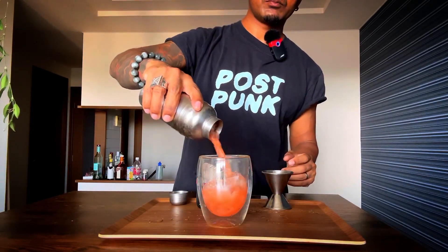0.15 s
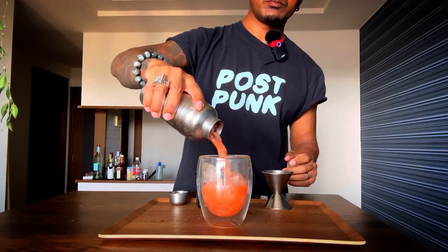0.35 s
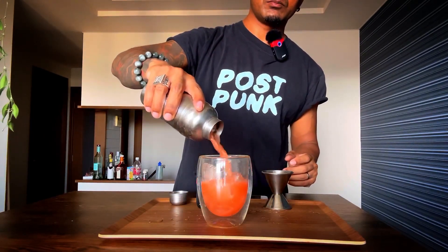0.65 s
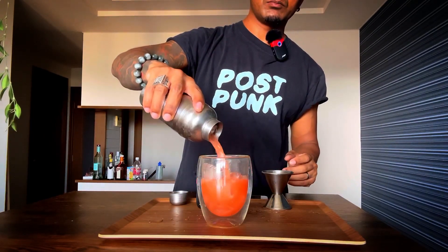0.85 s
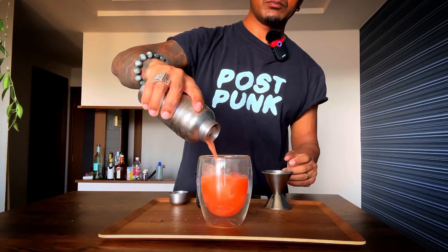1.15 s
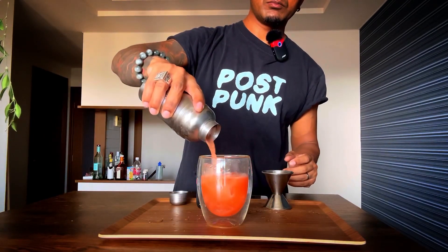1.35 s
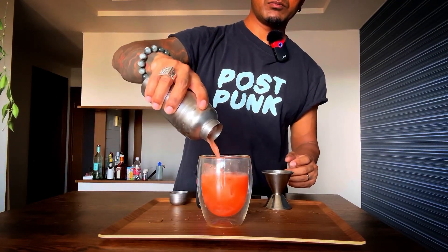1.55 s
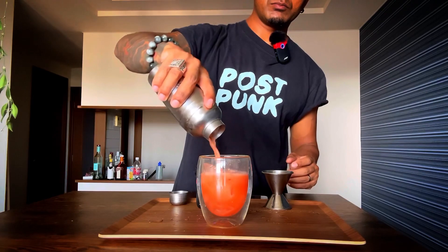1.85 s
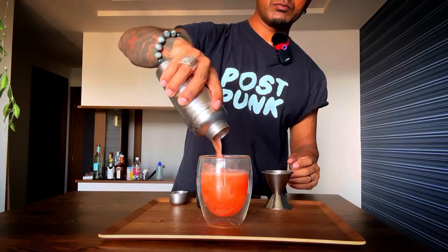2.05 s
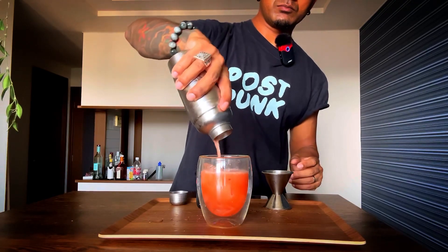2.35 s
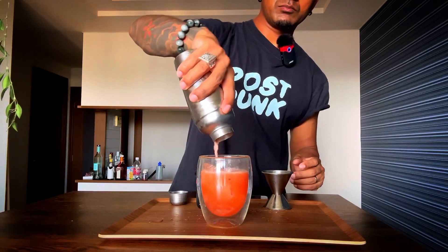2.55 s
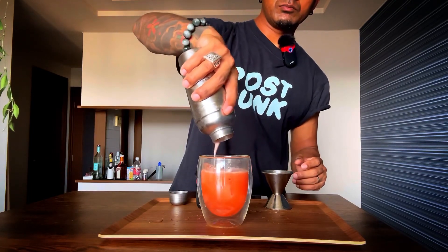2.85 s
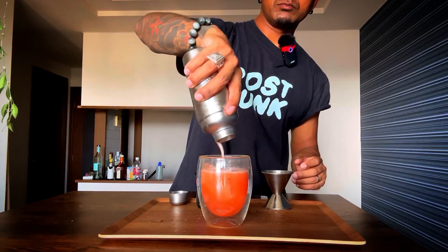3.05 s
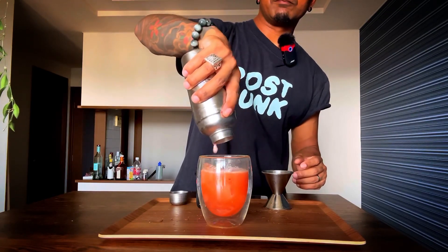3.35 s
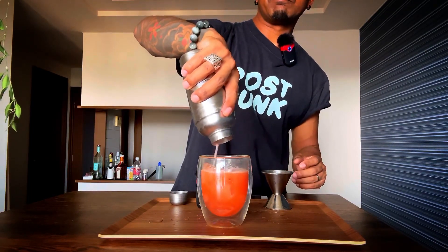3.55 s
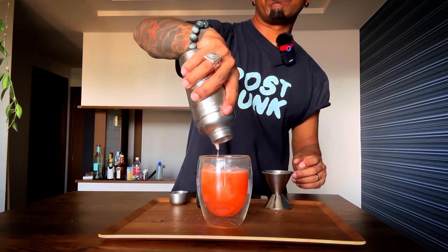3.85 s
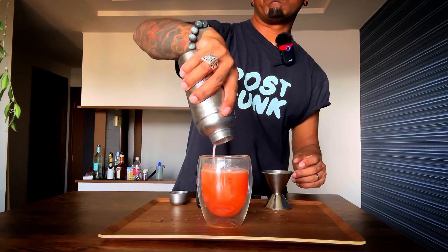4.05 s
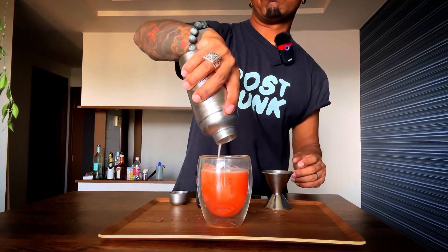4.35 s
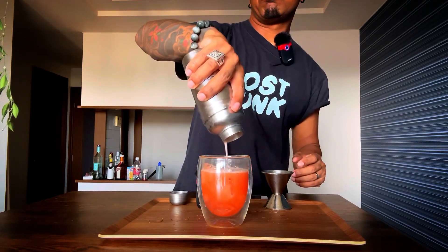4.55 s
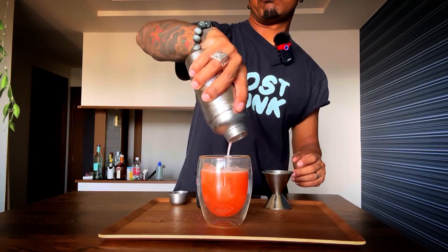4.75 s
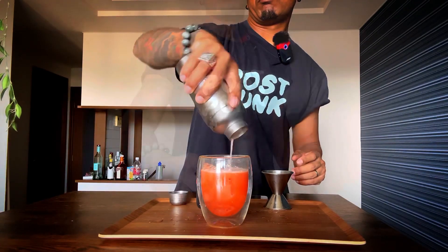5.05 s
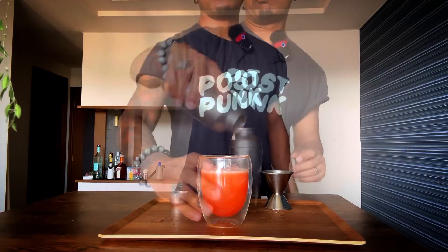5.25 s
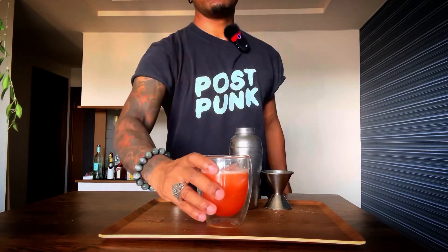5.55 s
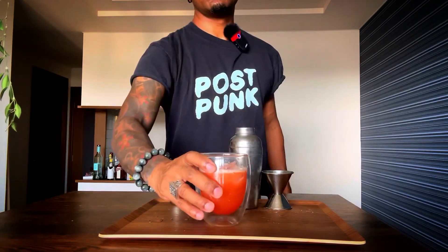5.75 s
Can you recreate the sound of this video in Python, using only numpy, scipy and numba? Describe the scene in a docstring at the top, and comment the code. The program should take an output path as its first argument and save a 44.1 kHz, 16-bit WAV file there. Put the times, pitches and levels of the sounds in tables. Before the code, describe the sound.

A close microphone catches thick slush splashing into a glass with small droplets and glassy ringing. The flow shrinks to a trickle, loose ice tumbles down the steel shaker and one cube snaps loudly against it. Regular, rapid, crunchy shakes follow, each with a short metallic rattle. They end abruptly, leaving soft low room tone in a small, slightly reverberant kitchen.

```python
"""Slushy cocktail poured from a steel shaker

A slushy drink pours into a glass in a small, quiet room, heard close up. Random grains and ringing bubbles
make the stream, which splashes, fizzes and thins; filtered bursts make the drops, the ice knocks and a hard crack.
The shaker is jiggled about seven times a second: ice and slush crunch on the strainer, ringing the steel, then stop.
Decaying sines make soft low thumps; filtered noise and wavering sines make the rumble, rustle and hum behind.
"""
import sys
import numpy as np
from scipy import signal
from scipy.fft import rfft, irfft, next_fast_len
from scipy.io import wavfile
from numba import njit

SR = 44100
rng = np.random.default_rng(int(sys.argv[2]) if len(sys.argv) > 2 else 0)


def wav_record(signal):
    """Record a signal, one row per channel, as 16-bit PCM in the file named by sys.argv[1]."""
    frames = np.transpose(np.atleast_2d(signal))
    bounded = np.clip(frames, -1, 1)
    # unit amplitude maps onto the largest positive 16-bit level
    quanta = np.round(bounded * 32767).astype(np.int16)
    wavfile.write(sys.argv[1], SR, quanta)


N = 259749
T = np.arange(N) / SR


def undb(db):
    """Decibels to gain."""
    return 10 ** (np.asarray(db) / 20)


def unit(x):
    """Scale to rms 1."""
    return x / np.sqrt(np.mean(x ** 2))


def curve(rows):
    """Second column of a timed table, drawn as straight lines through every sample."""
    times, values = np.transpose(rows)
    return np.interp(T, times, values)


def spectrum(points, hz):
    """Level in dB of a spectrum at the given frequencies, on a logarithmic frequency scale."""
    f, db = np.transpose(points)
    return np.interp(np.log(hz + 1), np.log(f), db)


def colour(x, points):
    """Filter a signal with a spectrum; rms 1."""
    size = next_fast_len(N)
    gain = undb(spectrum(points, np.fft.rfftfreq(size, 1 / SR)))
    return unit(irfft(rfft(x, size) * gain, size)[:N])


def add(out, s, x):
    """Mix a short sound in at time s."""
    i = int(np.clip(s * SR, 0, N - 1))
    out[i:i + len(x)] += x[:N - i]


def walk(rate):
    """Random wander with a spread near 1, through rate new values a second."""
    knots = rng.standard_normal(400)
    return np.interp(T * rate, np.arange(len(knots)), knots)


def grains(rate, spread_db):
    """Single-sample clicks of either sign and uneven size, rate a second on average."""
    clicks = (rng.random(N) < rate / SR) * rng.choice([-1, 1], N)
    return clicks * undb(spread_db * np.minimum(rng.exponential(size=N), 4))


def bubbles(count, low_hz, high_hz, cycles, spread_db, glide):
    """Bubbles at random times ring for some cycles, rising in pitch if glide is positive; most are faint."""
    out = np.zeros(N)
    for when, pitch, strength in rng.random((count, 3)):
        hz = low_hz * (high_hz / low_hz) ** pitch
        # age counts decay time constants, each lasting the given cycles
        age = np.arange(int(5 * cycles * SR / hz)) * hz / SR / cycles
        # sqrt(hz) makes up for the shorter life of a high bubble
        size = undb(spread_db * min(-np.log(1 - strength), 4)) * np.sqrt(hz)
        envelope = np.exp(-age) * (1 - np.exp(-8 * age))
        add(out, when * T[-1], size * envelope * np.sin(2 * np.pi * cycles * age * (1 + glide * age)))
    return unit(out)


def ring(x, modes):
    """What an object with these modes sings when x drives it: a sum of decaying sines."""
    t = T[:SR // 2]
    response = 0
    for hz, db, t60 in modes:
        mode = np.sin(2 * np.pi * hz * t) * 1000. ** (-t / t60)
        response = response + undb(db) * mode / np.linalg.norm(mode)
    return signal.fftconvolve(x, response)[:N]


@njit
def resonate(x, hz, width):
    """Band-pass with a moving centre [Hz] and a fixed width [Hz]."""
    y, band, low = np.empty(len(x)), 0., 0.
    for i in range(len(x)):
        g, k = np.tan(np.pi * hz[i] / SR), width / hz[i]
        v = (band + g * (x[i] - low)) / (1 + g * (g + k))
        band, low, y[i] = 2 * v - band, low + 2 * g * v, k * v
    return y


HIT_S = .006  # span over which a hit's level is reckoned


def contact(shape_db, crumble, crumble_s, size=1024):
    """A sharp push and a brief random crumbling, sent through a spectrum; rms 1 over HIT_S."""
    # causal (minimum-phase) response: all energy follows the moment of contact
    cepstrum = irfft(np.log(undb(shape_db)))[:size // 2]
    response = irfft(np.exp(rfft(2 * cepstrum, size) - cepstrum[0]))
    push = rng.standard_normal(size) * np.exp(-T[:size] / crumble_s)
    push *= crumble / np.linalg.norm(push)
    push[0] = 1
    # the crumbling scatters the push in time more than it colours it
    scatter = rfft(push, 2 * size)
    push = irfft(scatter / np.sqrt(np.abs(scatter)))[:size]
    hit = signal.fftconvolve(push, response)
    return hit * np.sqrt(HIT_S * SR) / np.linalg.norm(hit)


def hits(rows, base, below_db, ring_db, ring_width, crumble, crumble_s, size=1024):
    """Contacts coloured by each piece: one short resonance, a slope per octave below it, a treble slope."""
    out, hz = np.zeros(N), np.fft.rfftfreq(size, 1 / SR)
    for s, db, ring_hz, treble_db in rows:
        octaves = np.log2((hz + 1) / ring_hz)
        shape = spectrum(base, hz)
        shape += spectrum([(3500, 0.0059), (7000, treble_db)], hz)
        shape += below_db * np.clip(-octaves, 0, 2)
        shape += ring_db / (1 + (octaves / ring_width) ** 2)
        add(out, s, undb(db) * contact(shape, crumble, crumble_s))
    return out


# strength of the stream, which splash, fizz and droplets follow: (time [s], level [dB])
FLOW = [(0.0, -48), (0.24, -51), (0.45, -51), (0.97, -57), (1.08, -57.5), (2.1, -53.5), (2.55, -56),
        (2.8, -59.5), (3.26, -50), (4.4, -63.5), (5.02, -61.5), (5.2, -99)]
# air above the drink rises in pitch as the glass fills: (time [s], resonance [Hz])
CAVITY = [(0, 1130), (.2, 1290), (.42, 1620), (.8, 1740), (2.4, 1710), (5, 1880)]
# the loudest drops and ice chips landing in the glass:
# (time [s], level [dB], ring [Hz], treble slope [dB])
DROPS = [(0.0234, -32.5, 6300, -11), (0.0752, -36, 8700, -12), (0.0856, -38, 5940, -3),
         (0.1536, -35.5, 10500, -4), (0.2244, -44, 6160, -13), (0.2323, -33.5, 3800, -8),
         (0.2486, -37.5, 9150, 11), (0.2562, -35, 3600, -28), (0.2835, -36, 1600, -14),
         (0.3029, -39.5, 8450, -11), (0.3543, -37.5, 7350, -14), (0.3851, -35, 1300, -0.5),
         (0.4061, -35, 1740, -8), (0.5057, -38, 2560, -23), (0.6268, -45, 6100, 2),
         (0.6401, -40, 3300, -17), (0.6446, -32.5, 2720, -6.5), (0.67, -38.5, 5430, 0),
         (0.681, -37, 1600, 2), (0.7256, -34.5, 8950, 13), (0.7956, -32.5, 5700, -6),
         (0.8296, -40.5, 5500, 1), (0.852, -42, 9300, -15), (0.9321, -39.5, 710, -17),
         (0.9658, -42.5, 650, 2), (0.9699, -32.5, 2820, -35), (1.2442, -49.5, 4220, -4),
         (1.4773, -47.5, 8740, 2), (1.9243, -48.5, 1480, -15), (1.9531, -54.5, 1750, -5),
         (2.26, -52.5, 7900, -10)]
# tone of splash, froth and drops: (frequency [Hz], level [dB])
SPLASH_COLOUR = [(100, -30), (220, -23), (400, 0), (700, 4.5), (930, -4), (1200, 0), (1650, -2), (2000, -9),
                 (2550, 2), (3600, -8), (6000, -14), (15000, -33)]
FIZZ_COLOUR = [(1000, -55), (4000, -3.5), (6500, 1), (9500, 2.5), (12500, -2.5), (16000, -9)]
DROP_COLOUR = [(100, -35), (500, -8.5), (1300, 0), (2600, -4), (4200, -12), (7000, -0.5), (11000, -5.5),
               (16000, -24)]
# modes of the glass wall and its air: (frequency [Hz], level [dB], decay by 60 dB [s])
GLASS = [(1143, -7, .18), (1262, -11, .18), (1610, -9, .1), (2377, -2, .14), (2560, -7, .13),
         (5280, -3, .16), (5520, -2, .16), (7415, -10, .1)]
THINS_S, TRICKLE_END_S = (0.96, 1.14), 2.4  # thick stream narrows to a trickle; last free droplets
FIZZ_DB, FIZZ_GROWTH, FIZZ_FLICKER_DB = -59, 0.74, 2.5  # at full flow; dB per dB of flow; wander


def pour():
    """The stream splashes and bubbles into the glass; the air above the drink resonates, froth fizzes."""
    # a thick stream traps ringing bubbles; the thin trickle that follows mostly ticks
    flow_db, plunge = curve(FLOW), np.interp(T, THINS_S, [1, .28])
    large = bubbles(count=3400, low_hz=800, high_hz=4000, cycles=6, spread_db=3.2, glide=.016)
    ticks = .6 * unit(grains(rate=1500, spread_db=3.5))
    splash = colour(ticks + plunge * large, SPLASH_COLOUR)
    splash = unit(splash + 1.3 * resonate(splash, curve(CAVITY), 176.0))
    froth = bubbles(count=4500, low_hz=3500, high_hz=14000, cycles=5, spread_db=4.5, glide=.008)
    pops = .25 * unit(grains(rate=500, spread_db=4))
    fizz = colour(plunge * froth + pops, FIZZ_COLOUR) * undb(FIZZ_FLICKER_DB * walk(30))
    fizz_db = FIZZ_DB + FIZZ_GROWTH * (flow_db - flow_db.max())
    stream = splash * undb(flow_db - 5.5) + fizz * undb(fizz_db)
    small = droplets(0, THINS_S[0], count=26) + droplets(THINS_S[0], TRICKLE_END_S, count=12)
    drops = hits(DROPS + small, DROP_COLOUR, below_db=-3.0, ring_db=15, ring_width=.14,
                 crumble=1.5, crumble_s=0.0025)
    wet = stream + drops
    return wet + undb(-22.5) * ring(wet, GLASS)


DROPLET_DB, DROPLET_SPREAD_DB = 6.5, 2.5  # above the flow strength; random either way
DROPLET_LOW_HZ, DROPLET_HIGH_HZ = 1216, 7850


def droplets(start_s, end_s, count):
    """Fainter drops of random size, spread unevenly over a stretch of the pour; the level follows the flow."""
    rows = []
    for k, (when, size, strength, bright) in enumerate(rng.random((count, 4))):
        s = start_s + (end_s - start_s) * (k + when) / count
        db = np.interp(s, *np.transpose(FLOW)) + DROPLET_DB + DROPLET_SPREAD_DB * (2 * strength - 1)
        ring_hz = DROPLET_LOW_HZ * (DROPLET_HIGH_HZ / DROPLET_LOW_HZ) ** size
        rows.append((s, db, ring_hz, -12 + 16 * bright))
    return rows


# jiggles of the shaker: (time [s], knock on the strainer [dB], slush thrown with it [dB],
# time until the ice falls back [s], its landing [dB])
JIGGLES = [(2.6935, -57, -51.5, .056, -49), (2.8355, -40.5, -62, 0.048, -51),
           (2.9765, -45.5, -54, 0.046, -45.5), (3.1324, -44, -45.5, 0.039, -40.5),
           (3.275, -41, -45.5, .028, -45), (3.4084, -33.5, -49, 0.019, -47), (3.5365, -45, -48, 0.028, -47),
           (3.6704, -45, -45, 0.039, -44), (3.8086, -41, -45.5, 0.04, -48), (3.947, -44.5, -45, 0.038, -47),
           (4.0839, -42, -48.5, 0.029, -51), (4.2135, -41, -55.5, 0.035, -52.5),
           (4.3468, -46, -50, 0.029, -52.5), (4.4783, -51, -52, 0.045, -54.5),
           (4.6174, -57.5, -57, 0.027, -58.5), (4.7417, -44.5, -52.5, 0.041, -50.5),
           (4.8801, -41.5, -51.5, 0.04, -48.5), (5.0085, -48.5, -60, 0.045, -74)]
# single cubes tumbling down the shaker as it is tipped up, and two loose chips just ahead of the jiggle knocks
# at 3.13 s and 3.28 s: # (time [s], level [dB], ring [Hz], treble slope [dB])
KNOCKS = [(1.369, -51.5, 2540, -6), (1.4218, -40.5, 2380, 1), (1.5095, -54.5, 2600, -6),
          (1.5946, -45.5, 2767, 14.5), (1.6197, -41.5, 2530, 10), (1.6291, -45, 2536, -1),
          (1.7193, -33, 4600, -1), (1.7449, -42, 2740, 7), (1.7557, -35.5, 2900, 1),
          (1.8212, -48.5, 2200, 0), (1.8369, -54, 3320, 22), (2.0117, -46, 1662, 10.5),
          (2.017, -46, 2780, -19), (2.1167, -44, 2704, -9), (2.1415, -39, 815, -21), (2.1514, -35, 3100, 2),
          (2.2965, -51.5, 1700, -3), (2.4154, -45, 1570, -13), (2.4332, -55, 2450, 10),
          (3.1036, -49.5, 2740, -8), (3.2452, -43, 2720, 3)]
# slush sliding down the upended shaker: (time [s], level [dB])
SLIDE = [(2.2, -100), (2.4, -60), (2.7, -61), (2.95, -65), (3.2, -100)]
# tone of slush, slide, tumbling cubes and jiggled ice: (frequency [Hz], level [dB])
SLUSH_COLOUR = [(80, -7), (220, 5.5), (350, 8.5), (480, -9), (680, 7), (950, -12.5), (1180, 3.5),
                (1500, -7.5), (1900, -3), (2700, 1), (4200, -14.5), (5300, -12), (7000, -22), (15000, -21)]
SLIDE_COLOUR = [(100, -25), (280, 5.5), (500, -5), (820, 0), (1300, -19), (2100, -9), (2450, -15),
                (2900, -9), (8000, -36)]
TUMBLE_COLOUR = [(100, 4), (400, 9), (900, 11.5), (1200, 4.5), (1900, 12.5), (2200, 6.5), (2750, 14),
                 (3600, 1), (4700, 0.5), (5600, -6.5), (7500, -6.5), (11000, -15), (16000, -36.5)]
ICE_COLOUR = [(100, 5), (300, 9), (700, 12.5), (1400, 4.5), (2700, 6), (4500, -5), (7800, -6.5),
              (9500, -10.5), (16000, -34)]
# modes of the steel shaker: (frequency [Hz], level [dB], decay by 60 dB [s])
STEEL = [(1150, -11, .06), (1885, -5.5, .09), (2540, -6.5, .13), (2585, -5, .13), (2790, -12, .06),
         (3690, -7, .08), (4640, -8, .08), (6620, -7, .07), (7310, -5, .07), (8035, 0, .09),
         (9700, -3, .08), (11830, 0, .09)]
# slush crunches in a short burst going forward and a longer, softer one going back
THROW_S, SETTLE_S, SETTLE_LAG_S, SETTLE_DB = 0.013, 0.023, 0.0063, -8


def shaker():
    """Cubes knock and slush crunches against the strainer, then falls back; the steel rings with both."""
    force = np.zeros(N)
    for s, _, slush_db, back_s, back_db in JIGGLES:
        force += undb(slush_db) * np.exp(-((T - s) / THROW_S) ** 2)
        settle = s + back_s + SETTLE_LAG_S
        force += undb(back_db + SETTLE_DB) * np.exp(-((T - settle) / SETTLE_S) ** 2)
    # chips of every size give short, low-pitched and high-pitched crunches
    chips = bubbles(count=5000, low_hz=500, high_hz=9000, cycles=2, spread_db=2.5, glide=0)
    slush = force * colour(unit(grains(rate=2400, spread_db=3.5)) + .5 * chips, SLUSH_COLOUR)
    # with the shaker upended, slush slides softly down its wall
    slide = colour(grains(rate=4000, spread_db=1), SLIDE_COLOUR) * undb(curve(SLIDE))
    tumbling = hits(KNOCKS, TUMBLE_COLOUR, below_db=-6.5, ring_db=7, ring_width=0.25,
                    crumble=2.2, crumble_s=0.0011)
    jiggling = hits(jiggle_knocks(), ICE_COLOUR, below_db=-1.5, ring_db=10.5, ring_width=0.1,
                    crumble=2.4, crumble_s=.0016)
    ice = slush + slide + jiggling
    # tumbling cubes and the hardest blow are mostly dry snaps and ring the wall less
    snap = crack()
    driven = ice + .6 * tumbling + .25 * snap
    return ice + tumbling + snap + undb(-21) * ring(driven, STEEL)


# a leading cube touches just before the main knock, and the falling ice lands twice
LEAD_S, LEAD_DB, BOUNCE_S, BOUNCE_DB = .007, -1, .014, -3.5
STRAINER_HZ, WALL_HZ, BASE_HZ = 2590, 1900, 3720  # ring of the places that the ice meets
# harder knocks are brighter: treble dB per dB above an ordinary knock
ORDINARY_KNOCK_DB, BRIGHTENING, KNOCK_TREBLE_DB = -44.5, 0.63, 1
# loose chips of any size rattle after each knock, the more slush the louder
CHIP_DB, CHIP_SPAN_S, CHIP_HZ = -8.5, .075, (1200, 4500)
# random spread of the lesser knocks' level and time, and of the strainer's pitch (as a fraction)
KNOCK_SCATTER_DB, KNOCK_SCATTER_S, RING_SCATTER = 1.0, .0008, .05


def jiggle_knocks(count=2):
    """Each jiggle throws the cubes against the strainer and lets them fall back, among a few loose chips."""
    rows = []
    for s, knock_db, slush_db, back_s, back_db in JIGGLES:
        treble_db = KNOCK_TREBLE_DB + BRIGHTENING * (knock_db - ORDINARY_KNOCK_DB)
        strainer_hz = STRAINER_HZ * (1 + RING_SCATTER * rng.standard_normal())
        rows.append((s, knock_db, strainer_hz, treble_db))
        lesser = [(-LEAD_S, slush_db + LEAD_DB, WALL_HZ),
                  (back_s, back_db, BASE_HZ),
                  (back_s + BOUNCE_S, back_db + BOUNCE_DB, WALL_HZ)]
        for _ in range(count):
            lesser.append((rng.uniform(0, CHIP_SPAN_S), slush_db + CHIP_DB, rng.uniform(*CHIP_HZ)))
        for delay, db, hz in lesser:
            late, hard = rng.standard_normal(2)
            when = s + delay + KNOCK_SCATTER_S * late
            rows.append((when, db + KNOCK_SCATTER_DB * hard, hz, KNOCK_TREBLE_DB))
    return rows


# tone of a cube snapping on steel: (frequency [Hz], level [dB])
CRACK_COLOUR = [(100, -33), (500, -21.5), (1150, -9.5), (1900, -6.5), (2550, -5), (3600, -16.5), (4600, -9),
                (5500, -16), (6500, 2), (7500, -1), (8700, -19), (9800, -8), (11800, -5.5), (16000, -29)]
CRACK_S, CRACK_DB = 2.0901, -20.5


def crack(size=1024):
    """The hard, bright snap of one cube on steel: a sharp push with little crumbling."""
    out = np.zeros(N)
    shape = spectrum(CRACK_COLOUR, np.fft.rfftfreq(size, 1 / SR))
    add(out, CRACK_S, undb(CRACK_DB) * contact(shape, crumble=.45, crumble_s=.0015))
    return out


# soft low thumps: gulps of the pour and, later, dull bumps of hand or ice in the shaker:
# (time [s], pitch [Hz], level [dB])
LOW_THUMPS = [(0.085, 113, -39.5), (0.394, 143, -35.5), (0.439, 175, -41.5), (0.467, 87, -39.5),
              (0.555, 199, -45), (0.641, 202, -36), (0.763, 197, -35.5), (2.882, 137, -42.5),
              (3.298, 126, -41.5), (3.564, 130, -37.5), (3.853, 142, -38.5), (4.567, 134, -44)]


def low_thumps():
    """Gulps and dull bumps: each a low sine that swells for 3.1 ms, then dies away."""
    out, t = np.zeros(N), T[:SR // 8]
    for s, hz, db in LOW_THUMPS:
        age = t / 0.0031
        add(out, s, undb(db) * age * np.exp(1 - age) * np.sin(2 * np.pi * hz * t))
    return out


def room(x, wet_db, t60_low, t60_high):
    """A short diffuse noise tail with a quick onset; above 4 kHz it dies with its own decay time."""
    t = T[:SR * 3 // 4]
    low_pass = signal.butter(2, 4000, fs=SR, output="sos")
    high_pass = signal.butter(2, 4000, "high", fs=SR, output="sos")
    low = signal.sosfilt(low_pass, rng.standard_normal(len(t))) * undb(-60 * t / t60_low)
    high = signal.sosfilt(high_pass, rng.standard_normal(len(t))) * undb(-60 * t / t60_high)
    tail = (low + high) * (1 - np.exp(-t / 0.00041))
    return x + undb(wet_db) * signal.fftconvolve(x, tail / np.linalg.norm(tail))[:N]


# dull rustle of the pouring arm: (time [s], level [dB])
ARM = [(0, -47.5), (.9, -49.5), (1.2, -60), (2.7, -51.5), (4.3, -53.5), (5.2, -92.5)]
ARM_COLOUR = [(20, 8.0), (55, 7), (110, -7), (260, -11.0), (600, -20.5), (2000, -38)]  # (Hz, dB)


def arm_rustle():
    """The pouring arm rustles: low noise whose level follows the table and flutters."""
    return colour(rng.standard_normal(N), ARM_COLOUR) * undb(curve(ARM) + 2 * walk(18))


# a distant appliance's steadier tones: (frequency [Hz], level [dB])
HUM = [(207, -71.5), (507, -76.5)]
# its deepest tone swells and fades: (time [s], level [dB])
HUM_SWELL = [(0, -55), (1.1, -76), (1.8, -65), (2.3, -56), (2.8, -56.5), (3.05, -68), (4.1, -58.5),
             (5.1, -62.5), (5.89, -59)]
HUM_HZ = 74.3


def appliance_hum():
    """A distant appliance hums: sines that waver in phase and level, the deepest one swelling."""
    hum = tone(HUM_HZ) * undb(curve(HUM_SWELL) + 2 * walk(11))
    for hz, db in HUM:
        hum += undb(db + 2 * walk(1.98)) * tone(hz)
    return hum


def tone(hz):
    """A sine of rms 1 whose phase wanders by about half a radian."""
    return np.sqrt(2) * np.sin(2 * np.pi * hz * T + .5 * walk(13.0))


# tone of the building's rumble and the hiss: (frequency [Hz], level [dB])
AIR = [(10, 13.5), (20, 3.5), (29, 4.5), (40, -5), (52, -14.5), (64, -8.5), (100, -21.5), (220, -24),
       (300, -28), (600, -31.5), (1400, -39.5), (4000, -45), (12500, -46.5), (16000, -58)]


def background():
    """Low rumble of the building and faint hiss from filtered noise, with the hum and the rustle of the arm."""
    air = colour(rng.standard_normal(N), AIR) * undb(-38.5)
    return air + appliance_hum() + arm_rustle()


def scene():
    """Pour, shaker and low thumps in the room, over its background."""
    sources = pour() + shaker() + low_thumps()
    return (room(sources, wet_db=-10.5, t60_low=0.26, t60_high=0.19) + background())[None]


def record(dry):
    """The recorder blocks the deepest rumble below 14 Hz and cuts the top above 16 kHz."""
    dry = signal.sosfilt(signal.butter(2, 14, "high", fs=SR, output="sos"), dry)
    return signal.sosfilt(signal.ellip(8, .2, 70, 16000, fs=SR, output="sos"), dry)


dry = scene()
out = record(dry)
wav_record(out)
```